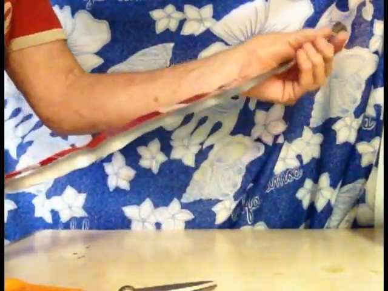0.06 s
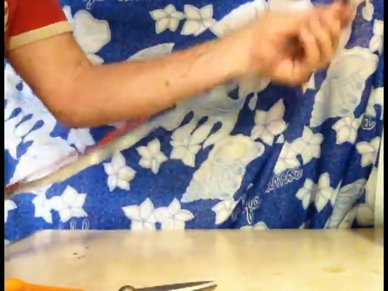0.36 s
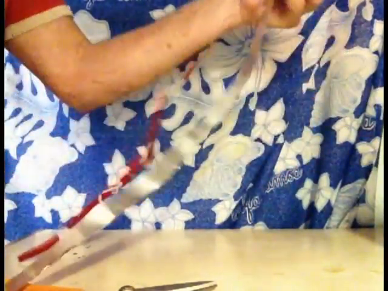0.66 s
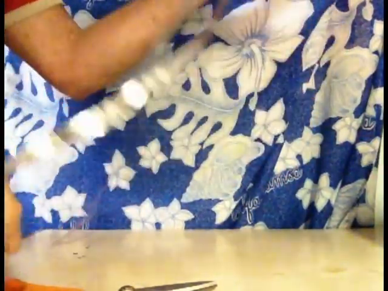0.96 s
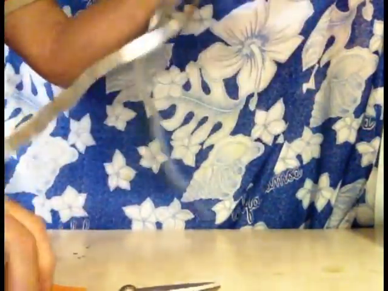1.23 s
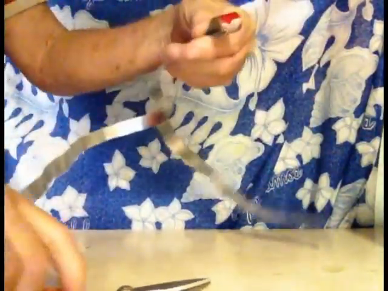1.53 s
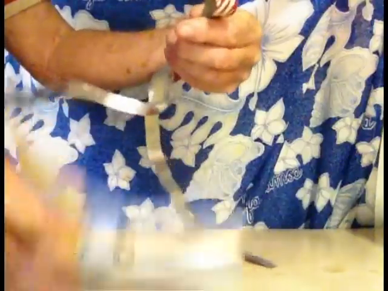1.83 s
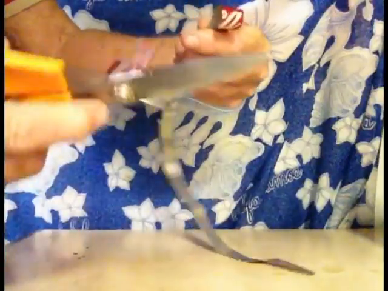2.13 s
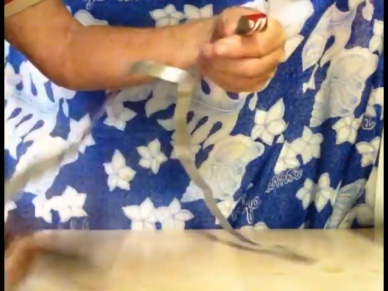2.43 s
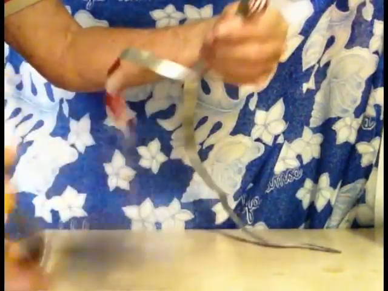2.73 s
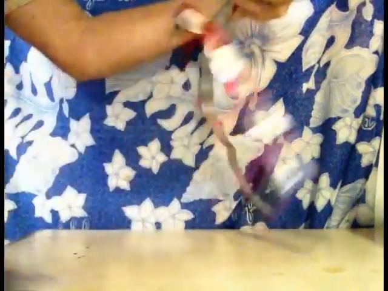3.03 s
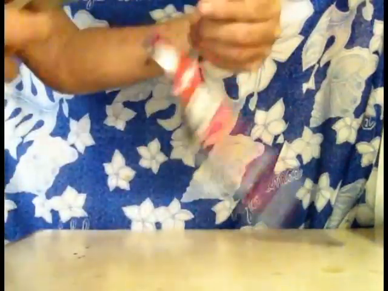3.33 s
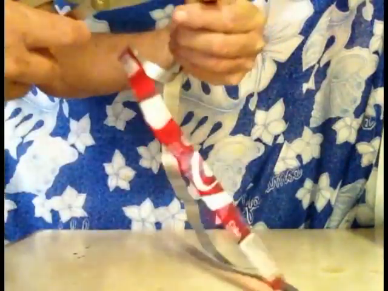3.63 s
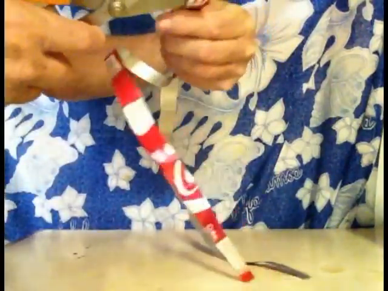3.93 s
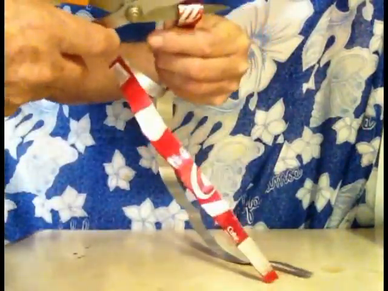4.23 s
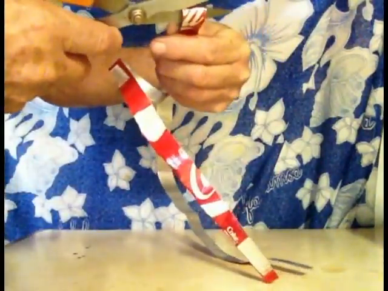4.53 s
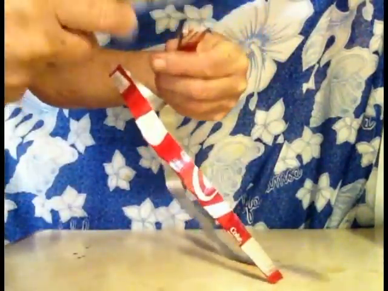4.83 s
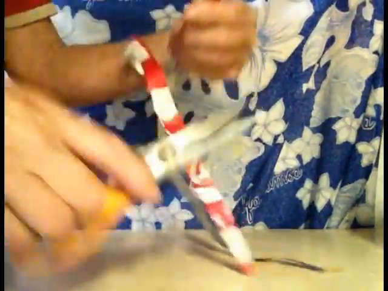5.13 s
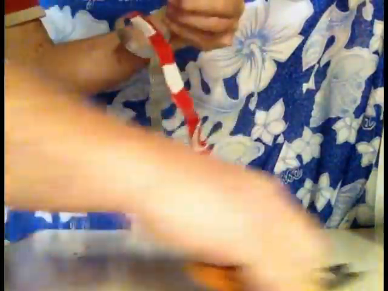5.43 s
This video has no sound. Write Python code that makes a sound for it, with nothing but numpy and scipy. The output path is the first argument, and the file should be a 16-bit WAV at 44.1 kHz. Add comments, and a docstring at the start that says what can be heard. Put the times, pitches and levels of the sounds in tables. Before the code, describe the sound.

In a small, quiet room, close to the microphone, thin aluminium crinkles and slides with a bright hiss. Scissors scuff and bump on a tabletop as they are picked up. More rustling and lightly ringing taps lead to two loud metallic snaps. The blades grind softly along the strip, pause, then shut in a single sharp snip. Finally the scissors land on the table, rattling and thudding.

```python
"""Over faint room noise, a long strip of thin aluminium rustles and crackles above a table in a small room.
Scissors are dragged off the table, brush and tap the strip, shear along it, snip through, and are put
down again with a clatter. Each buckle of the foil is a flurry of tiny slips that excites the strip's
bending modes; the table top acts as a sounding board and booms under the scissors."""
import sys
import numpy as np
from scipy import signal
from scipy.fft import rfft, irfft
from scipy.io import wavfile

SR = 44100
rng = np.random.default_rng(int(sys.argv[2]) if len(sys.argv) > 2 else 0)


def output_pcm(signal):
    """Save a mono or channel-first signal as 16-bit PCM at the path in sys.argv[1].

    Samples are clipped to [-1, 1] before scaling.
    """
    pcm = np.clip(np.atleast_2d(signal).T, -1, 1) * 32767
    wavfile.write(sys.argv[1], SR, np.round(pcm).astype(np.int16))


N = 250032
TIME = np.arange(N) / SR
RING_TIME = TIME[:2 * SR // 5]  # time axis of a single event


def undb(db):
    """Amplitude ratio of a level in decibels."""
    return 10 ** (np.asarray(db) / 20)


def unit(x):
    """Normalisation to rms 1."""
    return x / np.sqrt(np.mean(x ** 2))


def blow(x):
    """Normalisation of a transient to the energy of 10 ms at rms 1."""
    return x * np.sqrt(SR / 100 / np.sum(x ** 2))


def add(out, at, x):
    """Superposition of x on out from a given time."""
    i = int(at * SR)
    out[i:i + len(x)] += x[:max(len(out) - i, 0)]


def through(x, response):
    """Convolution with an impulse response."""
    return signal.fftconvolve(x, response)[:len(x)]


def colour(x, points, size=4096):
    """Minimum-phase filtering by a spectrum of (frequency [Hz], level [dB]) points."""
    hz, db = np.transpose(points)
    bins_hz = np.maximum(np.arange(size // 2 + 1) * SR / size, 1)
    gain = undb(np.interp(np.log(bins_hz), np.log(hz), db))
    cepstrum = irfft(np.log(gain))
    cepstrum[1:size // 2] *= 2
    cepstrum[size // 2 + 1:] = 0
    return through(x, irfft(np.exp(rfft(cepstrum))))


def fade(t60):
    """Exponential decay by 60 dB in t60 seconds."""
    return np.exp(-np.log(1000) * RING_TIME / t60)


def wander(rate):
    """Random modulation between -1 and 1, turning rate times a second."""
    knots = np.arange(0, TIME[-1] + 1, 1 / rate)
    return np.interp(TIME, knots, rng.uniform(-1, 1, len(knots)))


def swell(age, db, rise, fall):
    """Envelope of sliding friction: the contact gathers speed, then fades 20 dB every fall seconds."""
    return undb(db - 20 * np.maximum(age - rise, 0) / fall) * np.clip(age / rise, 0, 1) ** 1.2


def ring(modes, scatter_db, detune, flex=0):
    """Modal superposition: each contact point weights the damped modes anew; flexing bends their pitch."""
    chance = rng.standard_normal((len(modes), 5))
    out = 0
    for (hz, db, t60), (size, shift, side, bend, sway) in zip(modes, chance):
        vibrato = flex * bend * np.sin(2 * np.pi * 10 * RING_TIME + np.pi * sway)
        pitch = hz * (1 + detune * shift + vibrato)
        amplitude = np.sign(side) * undb(db + scatter_db * size)
        out = out + amplitude * fade(t60) * np.sin(2 * np.pi * np.cumsum(pitch) / SR)
    return out


def slips(size, rate, spread_db):
    """Stick-slip friction as a Poisson train of impulses, a few much larger than the rest."""
    sizes = undb(spread_db * np.minimum(rng.exponential(size=size), np.pi))
    return (rng.random(size) < rate / SR) * sizes * rng.choice([-1, 1], size)


def disperse(x, t60=.035, wash_db=5, flex_share=.3):
    """Dispersion: bending waves smear each impulse into a metallic wash, partly renewed by flexing."""
    steady = through(x, blow(rng.standard_normal(len(RING_TIME)) * fade(t60)))
    energy = np.abs(through(x ** 2, blow(fade(t60)) ** 2))
    fresh = rng.standard_normal(len(x)) * np.sqrt(energy)
    wash = np.sqrt(1 - flex_share) * steady + np.sqrt(flex_share) * fresh
    direct = through(x, blow(1. * (RING_TIME == 0)))
    return direct + undb(wash_db) * wash


def table_reflection(x, lag_s=.000513, bounce=.48):
    """Comb filtering: the moving strip's sound interferes with its reflection from the table."""
    delay = lag_s * (1 + .5 * wander(9))
    return (x + bounce * np.interp(TIME - delay, TIME, x)) / np.sqrt(1 + bounce ** 2)


# room noise spectrum: (frequency [Hz], level [dB])
AIR_SPECTRUM = [(35, -34), (80, -15), (115, -7), (160, -6.5), (220, -1), (380, -3), (600, -9), (1100, -13),
                (2300, -13.5), (4000, -18.5), (8500, -21), (10500, -23), (15000, -27.5)]
# the background sinks near the end: (time [s], gain [dB])
BACKGROUND_GAIN = [(0, 0.5), (4.7, 0), (4.95, -5), (5.67, -4.5)]


def background():
    """The noise floor: broadband room noise, mains hum and a narrow band of electronic hiss."""
    air = undb(-58.5) * unit(colour(rng.standard_normal(N), AIR_SPECTRUM))
    band = signal.butter(2, [9100, 9700], "band", fs=SR, output="sos")
    hiss = undb(-69.5) * unit(signal.sosfilt(band, rng.standard_normal(N)))
    hum = undb(-69) * np.sin(2 * np.pi * 120 * TIME)
    return (air + hiss + hum) * undb(np.interp(TIME, *np.transpose(BACKGROUND_GAIN)))


# the strip's bending modes: (frequency [Hz], level [dB], t60 [s])
STRIP_MODES = [(2270, -10, .22), (2525, -8, .3), (3615, -6, .26), (4015, -3, .17), (4150, -2, .15),
               (4385, -3, .2), (5720, -3, .22), (5940, -3, .17), (6370, -2, .22), (7180, -7, .13),
               (8400, -5, .13), (8845, -5, .18), (9300, -4, .15), (9690, -5, .12), (10590, -3, .15),
               (11060, -6, .14), (11700, -3, .13), (12800, -5, .13), (13460, -6, .15), (14700, -5, .1)]


def strip_modes(ring_hz, focus_db):
    """Selective excitation: a contact favours modes near ring_hz; the rest lose 7 dB per octave away."""
    modes = []
    for hz, db, t60 in STRIP_MODES:
        boost_db = focus_db * np.exp(-((hz - ring_hz) / 130) ** 2)
        modes.append((hz, db + boost_db - 7 * abs(np.log2(hz / ring_hz)), t60))
    return modes


# spectra of grainy rubbing and of smooth sliding: (frequency [Hz], level [dB])
RUB_SPECTRUM = [(300, -16.5), (1000, -9.5), (1800, -12.5), (2600, -8), (4000, -3.5), (6000, -1.5),
                (7500, -2), (9500, -5.5), (14500, -4.5)]
SLIDE_SPECTRUM = [(2000, -24), (6000, -7), (7500, -12), (8700, 4), (10200, -1.5), (11500, -2.5),
                  (13000, 3.5), (15000, -2)]
# the strip rubs on itself, the arm and the blades:
# (start [s], level [dB], rise [s], 20 dB fall [s], sliding share [0-1], main mode [Hz])
STRIP_RUBS = [(0.51, -36.5, .022, .04, .4, 5940), (0.625, -34, .04, .09, .2, 3611),
              (0.84, -44, .02, .12, .9, 9300), (0.91, -36, .1, .1, .94, 9300),
              (1.015, -35.5, .035, .025, .97, 9300), (1.175, -40.5, .022, .035, .45, 5720),
              (1.235, -44.5, .018, .08, .1, 6370), (1.412, -43, .015, .07, .6, 5940),
              (1.62, -45.5, .015, .25, .45, 8400), (1.66, -44, .05, .18, .7, 8400),
              (1.785, -48, .03, .45, .3, 4390), (1.9, -38.5, .065, .2, .08, 4015),
              (2.04, -36, .03, .035, .05, 4015), (2.16, -40, .03, .11, .1, 4390),
              (2.235, -41, .045, .25, .1, 4150), (2.37, -41, .03, .08, .3, 4390),
              (2.45, -41, .035, .15, .4, 3611), (2.69, -48, .03, .15, .3, 2270),
              (2.77, -44.5, .07, .06, .85, 5720), (3.345, -38.5, .008, .07, .7, 5940),
              (3.41, -29, .022, .09, .7, 7180), (3.51, -30, .02, .11, .35, 5720),
              (3.555, -33, .027, .045, .85, 9300)]


def rustle():
    """Friction drives the strip: fast sliding hisses brightly, slow catching excites its modes."""
    out = np.zeros(N)
    for start, db, rise, fall, sliding, ring_hz in STRIP_RUBS:
        grains = disperse(slips(len(RING_TIME), rate=950, spread_db=2.5))
        wash = unit(colour(grains, RUB_SPECTRUM))
        fine_grains = disperse(slips(len(RING_TIME), rate=3000, spread_db=1.5))
        hiss = unit(colour(fine_grains, SLIDE_SPECTRUM))
        # whatever rubs the strip also damps its modes
        modes = [(hz, mode_db, .04) for hz, mode_db, _ in strip_modes(ring_hz, focus_db=5)]
        tone = unit(through(grains, ring(modes, scatter_db=1, detune=.003)))
        rub = np.sqrt(1 - sliding) * unit(wash + undb(-9) * tone) + np.sqrt(sliding) * hiss
        add(out, start, rub * swell(RING_TIME, db, rise, fall))
    catching = undb(2.5 * wander(70))
    return table_reflection(out) * catching


# spectrum of the dull body under each snap: (frequency [Hz], level [dB])
BODY_SPECTRUM = [(60, -20.5), (150, -2), (400, -7), (850, 1.5), (1400, -9), (2000, 3), (3000, -1),
                 (5000, -13)]


def snaps(events, spectrum, crack_size, wash_t60, sustain):
    """Impulse response of foil: a crack runs on as a flurry; modes ring, damped by hand and blades."""
    out = np.zeros(N)
    for at, db, length, body_db, ring_hz, ring_db in events:
        flurry = slips(len(RING_TIME), rate=5000, spread_db=4)
        flurry *= np.exp(-(RING_TIME / (.4 * length)) ** 2)
        flurry[0] += crack_size
        crack = blow(colour(disperse(flurry, wash_t60), spectrum))
        body = blow(colour(rng.standard_normal(len(RING_TIME)) * fade(.039), BODY_SPECTRUM))
        modes = [(hz, mode_db, sustain * t60) for hz, mode_db, t60 in strip_modes(ring_hz, focus_db=14)]
        tone = blow(ring(modes, scatter_db=2, detune=.002, flex=.003) * (1 - fade(.025)))
        add(out, at, undb(db) * (crack + undb(body_db) * body + undb(ring_db) * tone))
    return out


# spectrum of a buckle's crack: (frequency [Hz], level [dB])
BUCKLE_SPECTRUM = [(900, -31), (1700, -30), (2800, -7.5), (4000, 1), (6000, 2.5), (8000, 0), (10000, -0.5),
                   (12000, 2.5), (15000, -2.5)]
# buckles and taps of the strip:
# (time [s], level [dB], flurry length [s], relative body [dB], main mode [Hz], relative ring [dB])
BUCKLES = [(.521, -37.5, .041, -14, 5940, -22), (.610, -29, .03, -13, 10590, -18),
           (.645, -38, .03, -15, 5720, -10), (.667, -41, .02, -14, 3611, -3),
           (.698, -30, .018, -18, 11700, -10), (.772, -53, .02, 0, 3611, 8.5),
           (.773, -60, .01, -23, 2270, 10), (1.117, -44, .062, -15, 3611, -14),
           (1.244, -41, .03, -11, 9300, -15), (1.367, -45, .026, -14, 9300, -21),
           (1.475, -43.5, .038, -13, 9300, -24), (1.9655, -32.5, .028, -20, 3611, -6),
           (2.055, -43, .03, -22, 4100, 6.5), (2.066, -44, .025, -22, 3611, 5),
           (2.1355, -24.5, .058, -21, 4170, -6), (2.276, -45, .025, -22, 4390, 1),
           (2.309, -40, .025, -20, 4150, -1), (2.36, -35, .022, -26, 4300, -4),
           (2.473, -45, .025, -22, 3611, -6), (2.899, -18.5, .034, -12, 4150, -15.5),
           (3.4046, -17.5, .034, -19, 4390, -17.5), (3.5175, -30.5, .022, -25, 2525, -8),
           (3.8544, -25.5, .024, -9, 4010, -10), (5.021, -42.5, .026, -20, 3611, -12),
           (5.127, -53, .01, -11, 3611, 4)]


def buckles():
    """Buckling releases stored elastic energy at once; like a tap, it leaves the strip ringing."""
    return snaps(BUCKLES, BUCKLE_SPECTRUM, crack_size=3, wash_t60=.035, sustain=.8)


# spectrum of scuffing on the table: (frequency [Hz], level [dB])
SKID_SPECTRUM = [(60, -9), (105, -23), (150, 2), (360, 0.5), (550, -1), (1000, 1), (1300, -12),
                 (1700, -14.5), (3000, -17), (6000, -18), (15000, -30)]
# skids of the scissors: (start [s], level [dB], rise [s], 20 dB fall [s])
HANDLE_SKIDS = [(1.22, -47, .03, .11), (1.385, -43, .035, .3), (1.66, -37, .04, .03), (5.41, -35, .14, .25)]


def skids():
    """Sliding friction of the handles forces the table top into broadband vibration."""
    envelope = sum(swell(TIME - start, db, rise, fall) for start, db, rise, fall in HANDLE_SKIDS)
    return unit(colour(slips(N, rate=900, spread_db=1.5), SKID_SPECTRUM)) * envelope


# the table top's deep boom, its thud and its hollow knock: (frequency [Hz], level [dB], t60 [s])
BOOM_MODES = [(116, -12, .08), (165, -1, .06), (188, -2, .06), (207, 0, .08), (145, -5, .06)]
THUD_MODES = [(306, -4, .06), (340, -4, .04), (366, 0, .06), (400, -4, .04), (440, -2, .04), (487, -2, .05),
              (535, -7, .03), (580, -8, .03)]
KNOCK_MODES = [(637, -8, .03), (700, -7, .02), (787, 0, .03), (870, -2, .025), (940, -2, .025),
               (997, -2, .035), (1055, -3, .03)]
# the scissors' clack and the ring of their handles: (frequency [Hz], level [dB], t60 [s])
CLACK_MODES = [(1400, -4, .012), (1590, -1, .025), (1696, -2, .025), (1873, -2, .022), (2150, -1, .012),
               (2450, -1, .012), (2850, -1, .012), (3300, -3, .012)]
HANDLE_MODES = [(3800, -4, .011), (3941, 0, .014), (4100, -5, .011)]
# spectrum of steel landing: (frequency [Hz], level [dB])
TICK_SPECTRUM = [(1000, -27), (2500, -8.5), (5000, -1.5), (8000, -1.5), (11000, -8), (15000, -16)]
# scissors strike the table: (time [s], boom [dB], thud [dB], knock [dB], clack [dB], handle [dB], tick [dB])
IMPACTS = [(1.2239, -39, -33.5, -42, -50, -67, -62), (1.2547, -41, -33, -32.5, -40, -50, -60),
           (1.265, -41, -35, -45, -43.5, -60, -57.5), (1.277, -38.5, -35, -52, -54, -62, -60.5),
           (1.3872, -37, -30, -32.5, -44.5, -54, -60), (1.408, -38, -35, -39, -43, -58, -60),
           (1.503, -49, -39, -45, -47, -62, -66.5), (1.593, -55, -56, -46.5, -55, -72, -66.5),
           (1.7028, -36, -36, -42, -32, -52, -42.5), (1.706, -32, -33.5, -38, -28, -46, -38),
           (5.4174, -21.5, -29.5, -22, -50, -25.5, -34), (5.4445, -29, -35, -29.5, -50, -32, -42),
           (5.457, -36, -43, -34, -45, -37, -48), (5.5127, -24, -26, -23.5, -26.5, -32, -24.5),
           (5.531, -28, -31, -31, -33.5, -37, -39), (5.541, -22.5, -31, -31, -35, -45, -45),
           (5.551, -25, -33, -31, -38, -52, -50), (5.566, -23, -28, -28.5, -24, -42, -30),
           (5.6013, -25, -30, -35, -23.5, -42, -38), (5.617, -34, -31, -32, -33, -38, -50)]


def knocks(contact_s=.0007):
    """Impact excites the modes of table and scissors; the finite contact time softens the table's."""
    out = np.zeros(N)
    push = np.sin(np.pi * np.minimum(RING_TIME / contact_s, 1)) ** 2
    for at, *levels_db in IMPACTS:
        boom, thud, knock = (through(ring(modes, scatter_db=1.5, detune=.006), push)
                             for modes in (BOOM_MODES, THUD_MODES, KNOCK_MODES))
        clack = ring(CLACK_MODES, scatter_db=1.5, detune=.006)
        handle = ring(HANDLE_MODES, scatter_db=1.5, detune=.008) * (1 - fade(.005))
        burst = rng.standard_normal(len(RING_TIME)) * (fade(.008) + undb(-14) * fade(.03))
        parts = boom, thud, knock, clack, handle, colour(burst, TICK_SPECTRUM)
        add(out, at, sum(undb(db) * blow(part) for db, part in zip(levels_db, parts)))
    return out


# the handles grip as they are pulled away:
# (peak time [s], level [dB], rise and decay constant [s], pitch [Hz], glide [octaves/s])
HANDLE_JUDDERS = [(1.44, -46, .04, 205, -16), (1.525, -51, .03, 510, 3), (1.703, -32, .015, 505, -11)]


def judder(jitter=.06, overtone_db=-14):
    """Stick-slip oscillation of plastic on the table: a short groan of gliding, unsteady pitch."""
    out = np.zeros(N)
    for at, db, width, hz, glide in HANDLE_JUDDERS:
        age = np.clip(TIME - at, -.1, .1)
        pitch = hz * 2 ** (glide * age) * (1 + jitter * wander(300))
        phase = 2 * np.pi * np.cumsum(pitch) / SR
        groan = unit(np.sin(phase) + undb(overtone_db) * np.sin(2 * phase))
        out += groan * undb(db + 3 * wander(150)) * np.exp(-np.abs(TIME - at) / width)
    return out


def press(start, length, db, bite_db, attack_s=.015, bite_s=.04, release_s=.03):
    """Force envelope of a blade stroke: it bites, settles to a steady push and lets go."""
    age = np.maximum(TIME - start, 0)
    extra_db = bite_db * np.exp(-(age / bite_s) ** 2)
    release_db = 20 * np.maximum(age - length, 0) / release_s
    return np.minimum(age / attack_s, 1) * undb(db + extra_db - release_db)


# spectrum of the grinding edges: (frequency [Hz], level [dB])
SCRAPE_SPECTRUM = [(1000, -21), (2300, -9.5), (4000, -4.5), (5000, -7), (5800, -4.5), (7300, -6.5),
                   (8700, -2.5), (10000, -3.5), (12000, -6), (15000, -10)]
# the blades' modes: (frequency [Hz], level [dB], t60 [s])
BLADE_MODES = [(4100, -4, .1), (5701, 0, .14), (5850, -1, .08), (6293, -6, .12), (8440, -2, .09),
               (8839, -3, .1), (11480, -6, .1)]
# strokes over each other and through the foil: (start [s], length [s], level [dB], extra bite [dB])
BLADE_STROKES = [(3.735, .09, -49.5, 0), (3.88, .09, -46, 10), (3.97, .07, -51, 0), (4.04, .1, -44.5, 0),
                 (5.02, .11, -55, 2), (5.21, .06, -57, 0), (5.32, .06, -53, 2)]


def shear():
    """Friction-driven resonance: the edges grind and, pressed harder, sing in the blades' modes."""
    grains = slips(N, rate=1500, spread_db=4)
    scrape = table_reflection(unit(colour(disperse(grains), SCRAPE_SPECTRUM)))
    sing = unit(through(grains, ring(BLADE_MODES, scatter_db=1, detune=.001)))
    uneven_grip = undb(2.5 * wander(30))
    pressure = sum(press(*stroke) for stroke in BLADE_STROKES) * uneven_grip
    pressure_db = 20 * np.log10(pressure + 1e-9)
    sing_share = np.clip((pressure_db + 53) / 14, .05, .6)
    return (np.sqrt(1 - sing_share) * scrape + np.sqrt(sing_share) * sing) * pressure


# spectrum of the cut: (frequency [Hz], level [dB])
SNIP_SPECTRUM = [(900, -21.5), (1700, -32), (2400, -4), (3500, -4), (4600, -9), (6200, 2), (7500, 2.5),
                 (10000, 5.5), (12500, 6.5), (15000, 5)]
# the blades bite through, slam shut and rebound:
# (time [s], level [dB], flurry length [s], relative body [dB], main mode [Hz], relative ring [dB])
SNIP_CRACKS = [(4.7372, -16, .018, -17, 9690, -10), (4.7597, -17.5, .002, -19, 12800, -25),
               (4.7628, -21.5, .016, -22, 12800, -15), (4.794, -34, .012, -30, 12800, -2)]


def snip():
    """Contact damping: foil clamped between the closing blades cracks but hardly rings."""
    return snaps(SNIP_CRACKS, SNIP_SPECTRUM, crack_size=2.2, wash_t60=.022, sustain=.25)


# loose blades chatter on the table between bounces: (start [s], level [dB], rise [s], 20 dB fall [s])
BLADE_RATTLES = [(5.448, -44, .015, .3), (5.52, -38, .012, .1)]


def rattle():
    """Repeated excitation: many tiny contacts of the blades keep the scissors' modes ringing."""
    contacts = slips(N, rate=1200, spread_db=2.5)
    steel = unit(through(contacts, ring(CLACK_MODES + HANDLE_MODES, scatter_db=1, detune=.002)))
    ticks = unit(colour(disperse(contacts), TICK_SPECTRUM))
    envelope = sum(swell(TIME - start, db, rise, fall) for start, db, rise, fall in BLADE_RATTLES)
    return unit(steel + ticks / 2) * envelope


def table_top(x):
    """Radiation efficiency: the panel is too small to radiate much below its first modes."""
    return signal.sosfilt(signal.butter(4, 112, "high", fs=SR, output="sos"), x)


def room(x, wet_db, low_t60=.24, high_t60=.21, gap_s=.004):
    """Reverberation: close walls return a short diffuse tail in which the lows last longest."""
    noise = rng.standard_normal(len(RING_TIME))
    low = signal.sosfilt(signal.butter(1, 1500, fs=SR, output="sos"), noise)
    tail = (low * fade(low_t60) + (noise - low) * fade(high_t60)) * (RING_TIME > gap_s)
    return x + undb(wet_db) * through(x, tail / np.sqrt(np.sum(tail ** 2)))


def scene():
    """Superposition of strip, scissors and table, each reverberant, over the noise floor."""
    strip = buckles() + rustle() + shear()
    cut = snip()
    mix = room(strip, wet_db=-10) + room(cut, wet_db=-12.5)
    table = table_top(knocks() + skids() + judder() + rattle())
    return (mix + room(table, wet_db=-11.5) + background())[None]


def record(dry):
    """Band limiting: a small microphone drops the deep bass, and the top is cut steeply."""
    thin = signal.sosfilt(signal.butter(1, 60, "high", fs=SR, output="sos"), dry)
    return signal.sosfilt(signal.ellip(8, .2, 70, 15200, fs=SR, output="sos"), thin)


dry = scene()
out = record(dry)
output_pcm(out)
```